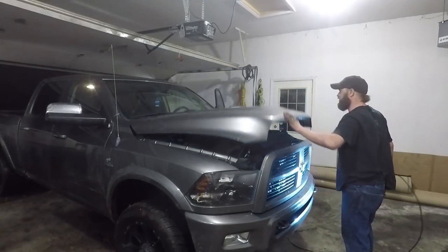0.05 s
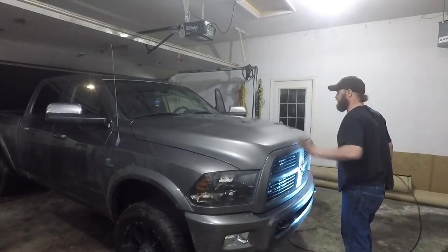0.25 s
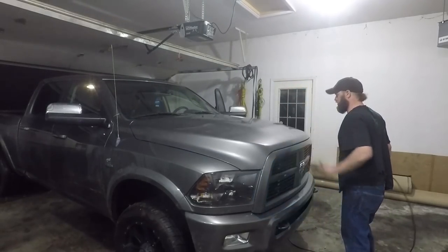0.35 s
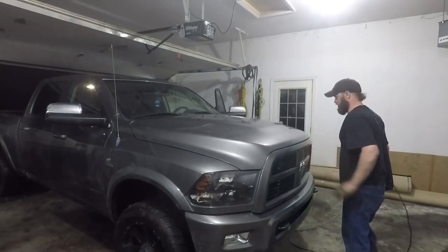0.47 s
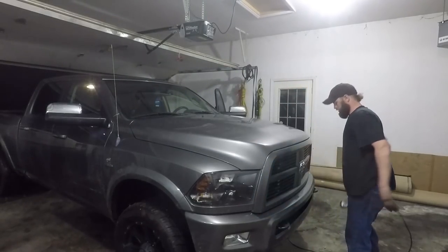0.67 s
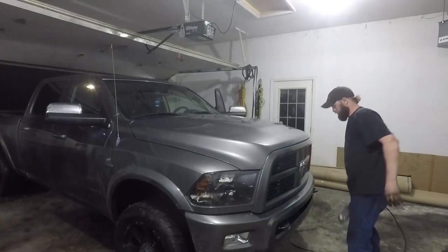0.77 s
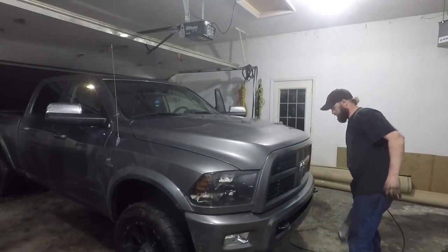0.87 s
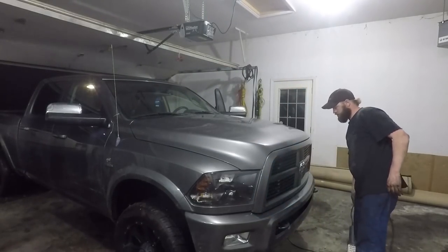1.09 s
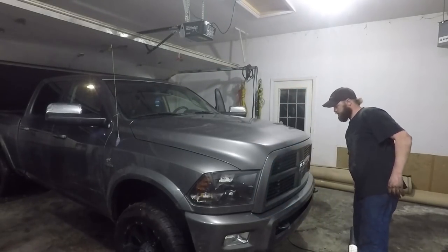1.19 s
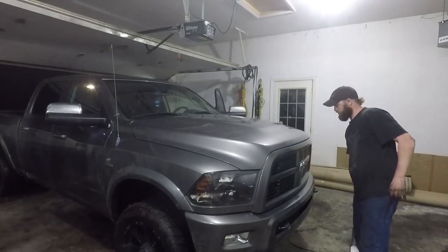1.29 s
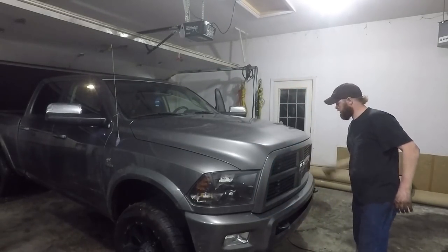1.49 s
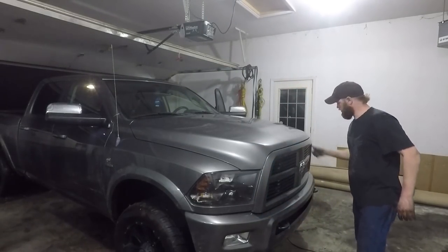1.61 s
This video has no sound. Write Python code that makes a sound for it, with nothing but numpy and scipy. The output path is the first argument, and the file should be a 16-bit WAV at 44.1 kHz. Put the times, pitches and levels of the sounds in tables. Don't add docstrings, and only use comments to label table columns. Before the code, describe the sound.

In a hard-walled garage, a vehicle hood drops shut with one loud metallic bang and hollow rumble, followed by a light metal clink and later soft foot sounds, picked up by a small camera with faint hiss and whine.

```python
import sys
import numpy as np
from scipy import signal
from scipy.fft import rfft, irfft
from scipy.io import wavfile
from scipy.ndimage import uniform_filter1d

SR = 44100
rng = np.random.default_rng(int(sys.argv[2]) if len(sys.argv) > 2 else 0)


def volts(x):
    e = np.asarray(x, float) / 20
    return 10 ** e


def file_out(sig):
    cols = np.atleast_2d(sig).T
    lim = np.clip(cols, -1, 1)
    pcm = np.round(lim * 32767).astype(np.int16)
    wavfile.write(sys.argv[1], SR, pcm)


N = 72765
LANDING_S = 0.232
# frequency [Hz], density [dB per Hz].
THUD_COLOUR = [(18, -61), (30, -30), (120, -13.5), (210, -10.5), (400, -11.5), (600, -16.5), (1000, -18.5),
               (1950, -26.5), (3300, -120)]


def evened(x):
    return x / np.sqrt(np.mean(x ** 2) + 1e-20)


def read(points, hz):
    f, value = np.transpose(points)
    return np.interp(np.log(hz + 1), np.log(f + 1), value)


def add(mix, start_s, sound):
    span = mix[round(start_s * SR):][:len(sound)]
    span += sound[:len(span)]


def coloured(points, size):
    hz = np.fft.rfftfreq(size, 1 / SR)
    return evened(irfft(rfft(rng.standard_normal(size)) * volts(read(points, hz)), size))


def burst(colour, t, rise_s, fall_s):
    shape = volts(read(colour, np.fft.rfftfreq(len(t), 1 / SR)))
    hull = np.minimum(t / rise_s, 1) * np.exp(-t / fall_s)
    x = rng.standard_normal(len(t)) * hull
    for _ in range(4):
        z = rfft(x)
        flat = z / (abs(z) + 1e-12)
        x = irfft(shape * flat, len(t)) * hull ** 0.3
    return x / np.linalg.norm(x) * np.linalg.norm(hull)


def strikes(rows, colour, modes, ring_db, rise_s):
    detune = 0.025
    out = np.zeros((3, N))
    t = np.arange(SR // 4) / SR
    for k, (start_s, db, burst_s) in enumerate(rows):
        ring = np.zeros(len(t))
        for hz, mode_db, t60_s in modes:
            shifted_hz = hz * (1 + detune * rng.uniform(-0.89, 1))
            ring += volts(mode_db - 60 * t / t60_s) * np.sin(2 * np.pi * shifted_hz * t)
        ring *= volts(ring_db) * np.minimum(t / rise_s, 1)
        add(out[k % 3], start_s, volts(db) * (burst(colour, t, rise_s, burst_s) + ring))
    return out


def swells(rows):
    t = np.arange(N) / SR
    out = np.zeros(N)
    for centre_s, hz, glide, db, length_s in rows:
        u = t - centre_s
        hull = np.sin(np.pi * np.clip(u / length_s + 0.5, 0, 1)) ** 2
        cycles = hz * u + glide / 2 * u ** 2 + rng.random()
        out += volts(db) * hull * np.sin(2 * np.pi * cycles)
    return out


def latch():
    # start [s], level [dB], burst decay [s].
    clanks = [
        (.2176, -22, .001),
        (.2188, -9, 0.0025),
        (.2235, -18.5, 0.0027),
        (.229, -13.5, 0.0052),
        (.234, -9.5, 0.0056),
        (.2395, -10.5, 0.0064),
        (.247, -11, 0.0068),
        (.255, -12.5, 0.0088),
        (.262, -15, 0.0067),
        (.27, -19.5, 0.0082),
    ]
    # frequency [Hz], density [dB per Hz].
    steel_colour = [(250, 0), (550, -5.5), (2400, -4), (3500, -1), (6000, -6), (7700, -8.5), (8300, -18),
                    (15500, -33)]
    # frequency [Hz], level [dB], t60 [s].
    steel_modes = [(2120, -3, 0.057), (3310, -4, 0.049), (3590, -7, 0.05), (4340, -1.5, 0.035),
                   (5614, 4, 0.027), (5810, 1, 0.028), (6170, 2.5, 0.029), (6220, 0.5, 0.026),
                   (6605, 1.5, 0.029), (7600, -10, 0.023)]
    return strikes(clanks, steel_colour, steel_modes, ring_db=-12, rise_s=0.002)


def boom():
    level_db, rise_s, fall_s = -5.5, 0.019, 0.058
    out = np.zeros(N)
    t = np.arange(SR // 2) / SR
    add(out, LANDING_S, volts(level_db) * burst(THUD_COLOUR, t, rise_s, fall_s))
    return out


def panel():
    wakes_s, rise_s = 0.2175, 0.018
    # centre [s], frequency [Hz], glide [Hz per s], level [dB], length [s].
    shudders = [(.228, 157, 0, -19, 0.055), (.25, 168, 0, -13.5, 0.048), (.28, 191, 900, -9.5, 0.09),
                (0.296, 142, 4, -14, 0.12), (.25, 320, 0, -25, 0.018), (.36, 305, 0, -22, .05),
                (.32, 230, 0, -19, 0.044), (0.51, 254, 0, -24.5, 0.046), (.345, 172.7, 0, -15.5, 0.1),
                (0.2694, 385, 492, -15, 0.1), (0.2513, 418, 0, -19.5, 0.06), (.31, 438, 400, -16, 0.08),
                (.357, 382, 504, -12, 0.095), (.405, 222, 2, -14.5, 0.081), (.35, 74, -7, -28, 0.11),
                (.4, 299, 0, -20.5, 0.11), (0.32, 270, 297, -20, 0.054), (.35, 257, 593, -18, 0.073),
                (.32, 320.5, 0, -20, 0.1), (.455, 199, 0, -19.5, 0.056), (0.47, 264, 200, -23, 0.089),
                (.53, 223, 0, -30, 0.092), (.6, 180, -200, -33.5, 0.062), (0.678, 214, 8, -42, 0.1),
                (0.5, 346, 200, -27, 0.058), (0.277, 535, 0, -21, 0.06), (0.402, 120, -3, -30, 0.11),
                (.255, 640, 3, -28, 0.039), (.345, 650, -500, -27, 0.026), (.32, 527, 0, -22.5, 0.058)]
    return np.clip((np.arange(N) / SR - wakes_s) / rise_s, 0, 1) * swells(shudders)


def swing():
    level_db, band_hz = -58.5, (150, 560)
    t = np.arange(N) / SR
    band = signal.butter(2, band_hz, "band", fs=SR, output="sos")
    groan = signal.sosfilt(band, rng.standard_normal(N))
    lumps = volts(5.9 * evened(uniform_filter1d(rng.standard_normal(N), 900)))
    return volts(level_db) * evened(groan * lumps) * np.clip((LANDING_S - t) / 0.01, 0, 1)


def dropped_part():
    # start [s], level [dB], burst decay [s].
    drops = [
        (.5795, -22.5, 0.0026),
        (.5822, -17, 0.0024),
        (.5875, -22.5, 0.0029),
        (.594, -28.5, 0.0035),
        (.6078, -21, 0.0015),
        (.617, -33.5, 0.0021),
    ]
    # frequency [Hz], density [dB per Hz].
    metal_colour = [(300, -8), (1300, 2.5), (3400, -6.5), (4200, -1.5), (4950, -2.5), (5250, -10),
                    (7700, -17.5), (15000, -47)]
    # frequency [Hz], level [dB], t60 [s].
    metal_modes = [(1073, 1, 0.023), (1326, 2.5, 0.028), (1800, 1, 0.02), (4270, -4, .015),
                   (4600, 1, 0.022), (4850, -6, 0.02), (6120, -2, 0.028)]
    return strikes(drops, metal_colour, metal_modes, ring_db=-13.5, rise_s=0.00067)


def heel_knock():
    # start [s], level [dB], burst decay [s].
    knocks = [
        (1.527, -32, 0.0035),
        (1.5325, -30, 0.0059),
        (1.543, -34.5, 0.005),
        (1.563, -38, 0.0084),
        (1.579, -37, 0.00876),
        (1.615, -45, .006),
    ]
    # frequency [Hz], density [dB per Hz].
    heel_colour = [(60, -30), (165, -21), (250, -8), (400, 2.5), (760, -5), (950, -14), (4000, -21),
                   (8000, -46)]
    # frequency [Hz], level [dB], t60 [s].
    heel_modes = [(162, 3.5, 0.099), (360, -2, 0.043), (490, 4, 0.04), (577, 8.5, 0.055), (745, 2, 0.07)]
    return strikes(knocks, heel_colour, heel_modes, ring_db=-16, rise_s=0.0024)


def board():
    # centre [s], frequency [Hz], glide [Hz per s], level [dB], length [s].
    answers = [(1.545, 168, -0.5, -39.5, 0.056), (1.54, 370, 1500, -36.5, 0.033),
               (1.531, 715, 0, -41, 0.019), (1.532, 560, 0, -40, .016), (1.547, 570, 0.5, -39, 0.017),
               (1.565, 544, 3000, -42, 0.03), (1.565, 347, 0, -42, 0.024), (1.585, 503, 9000, -40.5, 0.039),
               (1.615, 584, 0, -46, 0.032), (1.555, 452, 0, -41.5, 0.032), (1.575, 723, 0, -43.5, 0.045),
               (1.6, 394, 0, -45.5, 0.047), (1.635, 424, 0, -46.5, 0.034), (1.64, 630, 0, -47.5, .03)]
    return swells(answers)


def shoe_scuffs():
    # start [s], level [dB], burst decay [s].
    scuffs = [
        (1.504, -42, 0.0039),
        (1.5125, -36, 0.017),
    ]
    # frequency [Hz], density [dB per Hz].
    sole_colour = [(180, -34), (400, -4), (1310, -4), (1670, -6), (2040, -5.5), (2870, -7.5), (6300, -9.5),
                   (15000, -39.5)]
    return strikes(scuffs, sole_colour, [], ring_db=-40, rise_s=0.0012)


def shoe_drags():
    # start [s], level [dB], burst decay [s].
    drags = [
        (1.098, -51.5, 0.02),
        (1.415, -56.5, 0.04),
        (1.445, -51, 0.038),
        (1.475, -51.5, 0.021),
        (1.49, -53, 0.0083),
    ]
    # frequency [Hz], density [dB per Hz].
    drag_colour = [(300, -35), (1000, -3), (2500, -3.5), (6000, -1.5), (8000, -17), (15000, -22)]
    return strikes(drags, drag_colour, [], ring_db=-40, rise_s=0.018)


def weight_shifts():
    # start [s], level [dB], burst decay [s].
    shifts = [
        (1.17, -60, 0.034),
        (1.44, -51, 0.045),
    ]
    return strikes(shifts, THUD_COLOUR, [], ring_db=-40, rise_s=0.028)


def garage(x):
    wet_db = 9.5
    # frequency [Hz], t60 [s].
    garage_t60 = [(60, 0.51), (200, 0.74), (600, 0.72), (2000, 0.84), (5000, 0.81), (10000, 0.51)]
    at = np.arange(60, SR - 20, 20) + rng.integers(0, 20, (3, 2, (SR - 61) // 20))
    taps = np.zeros((3, 2, SR))
    np.put_along_axis(taps, at, rng.choice([-1., 1.], at.shape), 2)
    hz, t, z = signal.stft(taps, SR, nperseg=512)
    decay = volts(-60 * t / read(garage_t60, hz)[:, None])
    tail = signal.istft(z * decay, SR, nperseg=512)[1][..., :SR]
    tail = tail * (np.arange(SR) > 60) / np.linalg.norm(tail[0, 0])
    wet = signal.fftconvolve(x[:, None], tail, axes=2)[..., :N].sum(0)
    return x.sum(0) + volts(wet_db) * wet


def ports(near, other, same, left_db, lead):
    size = 2 * N
    hz = np.fft.rfftfreq(size, 1 / SR)
    c = np.clip(read(same, hz), 0, 1)
    g = volts(read(left_db, hz) / 2)
    turn = np.exp(0.5j * read(lead, hz))
    a, b = rfft(near, size), rfft(other, size)
    mean = np.sqrt(g ** 2 + g ** -2 + 2 * c * (turn ** 2).real) / 2
    left = a * g * turn
    right = (c * a / turn + np.sqrt(1 - c ** 2) * b) / g
    return irfft(np.array([left, right]) / mean, size)[:, :N]


def camera_whine():
    whine_hz, pulses_per_s, first_s, duty = 8931, 29.97, 0.004, 0.66
    level_db, left_db, wobble_rad = -62, -7, 0.6
    t = np.arange(N) / SR
    gate = np.sin(np.pi * np.clip((t - first_s) * pulses_per_s % 1 / duty, 0, 1))
    wobble = wobble_rad * evened(uniform_filter1d(rng.standard_normal(N), 700))
    return volts([[level_db + left_db], [level_db]]) * gate * np.sin(2 * np.pi * whine_hz * t + wobble)


def hush():
    level_db, drift_db = -45.5, 1.4
    # frequency [Hz], density [dB per Hz].
    hush_colour = [(12, -39), (20, -0.5), (266, -8), (427, -10.5), (534, -16), (581, -16), (1200, -23),
                   (9130, -36.5), (15500, -56)]
    # frequency [Hz], likeness [0..1].
    hush_same = [(60, 0.65), (260, 0.26), (750, 1), (1700, 0.043), (3900, 0.24), (6300, 0.062)]
    # frequency [Hz], level [dB].
    hush_left_db = [(60, 2.5), (340, 6.5), (1250, -2), (4500, -1), (6300, 3), (8000, -3)]
    # frequency [Hz], phase [rad].
    hush_lead = [(60, 0.7), (260, -0.2), (650, -1.5), (1450, -4), (2000, -1), (15000, 2)]
    fields = []
    for _ in range(2):
        z = signal.stft(coloured(hush_colour, N), nperseg=512)[2]
        patch = uniform_filter1d(rng.standard_normal(z.shape), 6, 0)
        patch = evened(uniform_filter1d(patch, 8, 1))
        drifting = signal.istft(z * volts(drift_db * patch), nperseg=512)[1][:N]
        fields.append(volts(level_db) * evened(drifting))
    return ports(*fields, hush_same, hush_left_db, hush_lead)


def scene():
    # frequency [Hz], likeness [0..1].
    blow_same = [(60, 0.91), (450, 1), (900, 1), (1500, 0.34), (2200, 0.51), (4200, 0.78), (6000, 0.067),
                 (10000, 0.1)]
    # frequency [Hz], level [dB].
    blow_left_db = [(60, 8), (340, 13), (600, 5.5), (1250, -7.5), (2000, -1), (3300, -3), (6300, 7),
                    (8500, 1)]
    # frequency [Hz], phase [rad].
    blow_lead = [(60, -0.8), (200, -0.23), (500, -1.5), (1150, -2), (1750, 0.87), (5000, 0.3), (7000, -1),
                 (12000, 2.5)]
    clank, metal, heel = latch(), dropped_part(), heel_knock()
    blows = clank + boom() / np.sqrt(3) + metal
    blows = blows + shoe_scuffs() + shoe_drags() + weight_shifts() + volts(-2.0) * heel
    near, other = (garage(volts(-4.0) * blows)
                   + volts(6.5) * (panel() + board())
                   + volts(-4.5) * heel.sum(0)
                   + volts(-12.5) * clank.sum(0)
                   + volts(-6.0) * metal.sum(0)
                   + swing())
    return ports(near, other, blow_same, blow_left_db, blow_lead) + hush() + camera_whine()


def low_cut(x, t):
    cut_hz, opens_s, opening_s = 135, 0.22, 0.12
    shut = np.clip(1 - (t - opens_s) / opening_s, 0, 1) ** 2
    high = signal.butter(8, cut_hz, "high", fs=SR, output="sos")
    return shut * signal.sosfiltfilt(high, x) + (1 - shut) * x


def gain_control(x, t):
    knee_db, squeeze, recover_db_per_s = -7.5, 0.63, 64
    slow_dip_db, slow_hold_s, slow_recover_db_per_s = -6, 0.67, 10.5
    power_db = 10 * np.log10(abs(uniform_filter1d((x ** 2).mean(0), 600)) + 1e-12)
    fall_db = t * recover_db_per_s
    held_db = np.maximum.accumulate(power_db + fall_db) - fall_db
    over_db = np.maximum(held_db - knee_db, 0)
    recovering_s = np.maximum(t - LANDING_S - slow_hold_s, 0)
    dip_db = (t > LANDING_S) * np.minimum(slow_dip_db + slow_recover_db_per_s * recovering_s, 0)
    return x * volts(uniform_filter1d(dip_db - squeeze * over_db, 200))


def roll_off(x):
    return signal.sosfilt(signal.butter(12, 15150, fs=SR, output="sos"), x)


def record(dry):
    t = np.arange(N) / SR
    x = gain_control(low_cut(dry, t), t)
    x = np.tanh(x * 1.238)
    edge = signal.firwin(255, 16000, window=("kaiser", 8), fs=SR)[None]
    mix = signal.oaconvolve(x, edge, "same")
    return roll_off(mix)


dry = scene()
out = record(dry)
file_out(out)
```